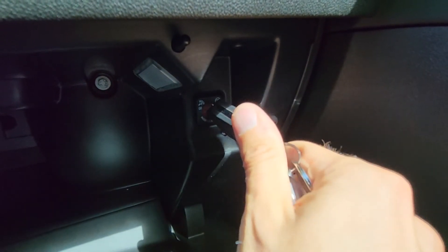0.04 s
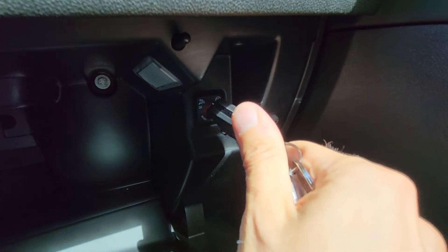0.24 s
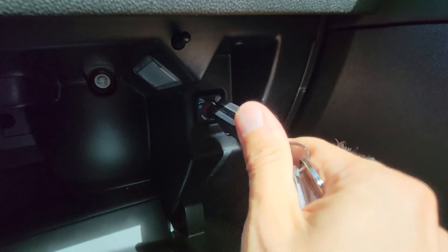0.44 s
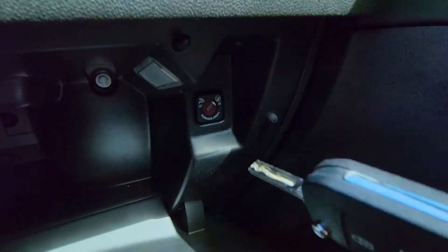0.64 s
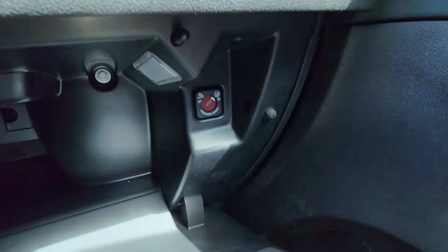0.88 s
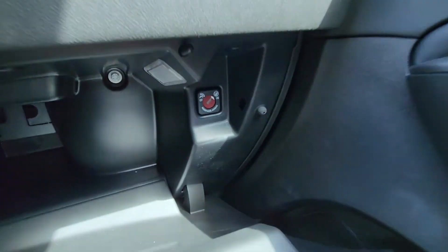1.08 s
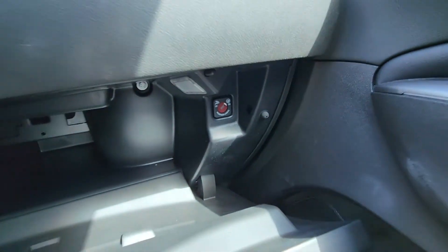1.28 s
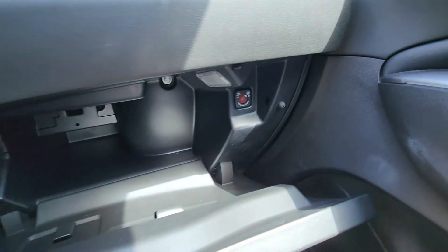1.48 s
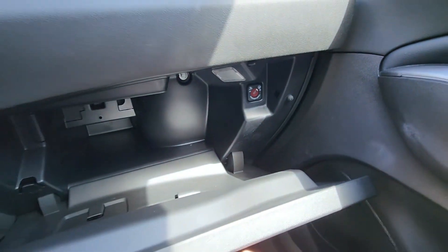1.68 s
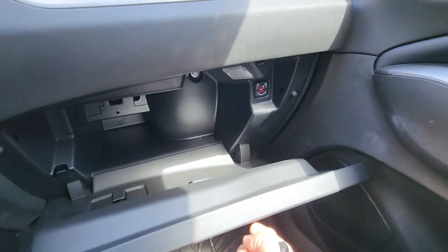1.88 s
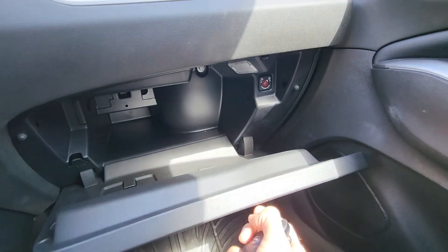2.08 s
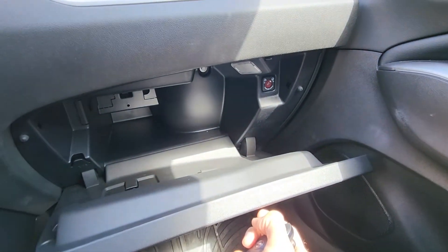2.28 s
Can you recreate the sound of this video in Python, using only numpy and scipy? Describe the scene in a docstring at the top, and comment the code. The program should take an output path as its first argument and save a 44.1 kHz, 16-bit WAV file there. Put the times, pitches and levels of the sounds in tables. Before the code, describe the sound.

A key grinds and jolts out of a glove box lock, clinking on its ring, then a soft hissing slide with a dry bump and one sharp click, close up in a quiet parked car.

```python
"""Key drawn from a glove box lock

Close to the lock in a quiet, dead car cabin, on a hand-held phone with two microphone ports.
The blade grinds and jolts out of the lock (rough noise, struck panel modes) and clinks on its ring (steel modes).
Something slides along the plastic trim with a hiss (finely broken noise) and one bump (a filtered impulse).
Then come a short scuff and one sharp, bright click: a few blows of crackle and ringing modes.
Soft knocks on the trim and low handling rumble go on under it, over a faint steady hush."""
import sys
import numpy as np
from scipy import signal
from scipy.fft import rfft, irfft, next_fast_len
from scipy.io import wavfile

SR = 44100
rng = np.random.default_rng(int(sys.argv[2]) if len(sys.argv) > 2 else 0)


def master_out(mix):
    """Clip the mix to full scale and print it as 16-bit PCM to the path in sys.argv[1]."""
    frames = np.transpose(np.atleast_2d(mix))
    ceiling = np.clip(frames, -1, 1)
    pcm = np.round(ceiling * 32767).astype(np.int16)
    wavfile.write(sys.argv[1], SR, pcm)


N = 102841

# Jolts of the blade over the lock's wafers: t/s, level/dB
WAFER_JOLTS = [(.38, -48), (0.396, -40), (0.412, -32.5), (0.419, -26.5), (0.441, -27), (0.4472, -19.5),
               (0.457, -25.5), (0.477, -30.5), (.483, -18), (.497, -20.5), (.505, -24.5)]
# Grinding level as the key is pulled: t/s, level/dB
PULL_LEVEL = [(.3, -89), (.375, -64.5), (.41, -37), (.455, -30.5), (.47, -39.5), (.51, -31.5),
              (.535, -60.5), (.57, -49.5), (.61, -100)]
# Modes of the plastic lock panel: f/Hz, level/dB, T60/s
PANEL_MODES = [(179, -7, 0.16), (262, -7.5, 0.28), (324, -1.5, 0.14), (546.3, -3.5, 0.089),
               (672.4, 0, 0.063), (1055, -8, 0.059), (1418, 6, 0.031), (1790, -6, 0.027)]
# Colour of the grinding: f/Hz, level/dB
GRIND_COLOUR = [(80, -20.5), (170, -11.5), (310, 1), (430, -10.5), (600, 2), (900, -13), (1500, -8.5),
                (2100, -20.5), (4500, -34.5), (9000, -39.5), (16000, -54)]
# Place of the lock, a little to the right: f/Hz, left minus right/dB
LOCK_BALANCE = [(150, -0.5), (600, -2), (1400, -8), (2500, -4.5)]
# Key against ring: t/s, level/dB, tilt/(dB per octave), T60 of the crack/s, body f/Hz, sheen f/Hz
RING_CLINKS = [(0.448, -33.5, -3, 0.031, 5000, 13000), (0.468, -40.5, 1, 0.043, 4650, 12100),
               (0.4737, -28.5, 5, 0.089, 4800, 9500), (0.4827, -17, 7, 0.028, 3940, 13500),
               (0.496, -34, -14.5, 0.078, 4100, 9670), (0.5286, -36, 4, 0.016, 3400, 9730),
               (0.543, -29, 3.5, 0.02, 3360, 8500), (0.5495, -21, 1, 0.03, 4835, 11930),
               (0.5509, -23.5, -1, 0.017, 3560, 12180), (0.5882, -24, -0.5, 0.022, 3250, 11600),
               (0.624, -30, -7, 0.023, 2740, 12000), (0.6314, -23, 2.5, 0.03, 2950, 11900),
               (0.683, -32.5, -7, 0.029, 3400, 12000), (0.6977, -28.5, -2, 0.019, 4400, 7100),
               (0.7763, -24, -3.5, 0.015, 3870, 12400), (0.8154, -35.5, 0.5, 0.029, 4560, 14000),
               (0.828, -33, 4, 0.039, 4500, 14500), (.867, -36.5, -1.5, 0.035, 4600, 7260)]
# Modes of key and ring: f/Hz, level/dB, T60/s
STEEL_MODES = [(2900, -2, 0.022), (3430, -7, 0.012), (3700, -1, 0.029), (4050, -1.5, 0.012),
               (4720, 1, 0.036), (5350, -12, .03), (6140, -5, .035), (6700, -9.5, 0.032),
               (7310, -1.5, 0.036), (9500, 2, 0.031), (11900, -7, .03), (12540, -9.5, 0.034),
               (13750, -5.5, 0.025)]
# Colour of the metal contact: f/Hz, level/dB
STEEL_COLOUR = [(300, -36.5), (1300, -20), (2000, -5), (2800, 1.5), (4700, 1), (6500, -2.5), (9500, -4.5),
                (12200, -3), (16000, -6)]
# Blows of the sharp click, then its small bounces: t/s, level/dB
CLICK_BLOWS = [(1.4013, -26), (1.404, -16), (1.407, -14.5), (1.4103, -21), (1.4205, -40), (1.4245, -36),
               (1.431, -44)]
# Modes of the clicking part: f/Hz, level/dB, T60/s
CLICK_MODES = [(1826, -11, .055), (2040, 0, .045), (2260, -7, .035), (2950, -10, .05), (3700, -12, .045),
               (4346, -5, .05), (4534, -4, .05), (5330, -6, .045), (5880, -4, .05), (7106, -9, .045),
               (11917, -5, .048), (12690, -6, .04), (13870, -6, .035), (15210, -2, .04)]
# Colour of the click's crack: f/Hz, level/dB
CLICK_COLOUR = [(200, -45.5), (900, -17), (1400, -6.5), (2200, 2.5), (3050, -8), (4500, 2), (8500, -3.5),
                (13000, 1.5), (16000, -2.5)]
# Faint steel modes that outlast the click: f/Hz, level/dB, T60/s
AFTER_RING_MODES = [(4670, 0, .2), (5030, -9, .16)]
# Level of the slide along the trim: t/s, level/dB
SLIDE_LEVEL = [(.3, -105), (.385, -78), (.43, -60), (.53, -52), (.6, -44.5), (.73, -41.5), (.82, -39.5),
               (1.0, -37), (1.1, -39.5), (1.19, -44), (1.22, -52), (1.25, -69.5), (1.32, -67.5),
               (1.45, -64), (1.56, -76.5), (1.85, -80), (2.0, -89)]
# Colour of the slide: f/Hz, level/dB
SLIDE_HISS = [(60, -10.5), (250, -9.5), (566, -9.5), (900, -12.5), (1450, -8), (2100, -8.5), (2840, -12.5),
              (4530, -9.5), (6000, -17), (9000, -23.5), (12500, -17.5), (16000, -20.5)]
# Level of the scuff around the click: t/s, level/dB
SCUFF_LEVEL = [(1.275, -100), (1.29, -58), (1.305, -76), (1.329, -62), (1.336, -45), (1.343, -43),
               (1.358, -56), (1.376, -56), (1.4, -47), (1.42, -100)]
# Colour of the scuff: f/Hz, level/dB
SCUFF_HISS = [(300, -25), (1200, -10.5), (1950, -3), (2350, -10), (2800, 0.5), (3500, 4), (5500, -6),
              (8300, -5), (16000, -9)]
# Small catches within the scuff: t/s, level/dB
SCUFF_CATCHES = [(1.3316, -37.5), (1.363, -45.5), (1.3796, -41)]
# Colour of these catches: f/Hz, level/dB
CATCH_COLOUR = [(1000, -20), (3000, -9), (5500, 0.5), (8300, -2.5), (16000, -5.5)]
# Colour of the one dry bump: f/Hz, level/dB
BUMP_COLOUR = [(60, -7), (250, -0.5), (520, 6.5), (900, -7), (1500, -2), (3300, -10.5), (4700, -35.5),
               (16000, -52)]
# Dull knocks on the trim: t/s, level/dB, T60 of the thud/s, pitch f/Hz
TRIM_KNOCKS = [(.565, -40.5, .05, 480), (.955, -22, 0.025, 496), (0.9619, -24, 0.036, 514),
               (0.9685, -27, 0.031, 506), (1.263, -46.5, 0.063, 475), (1.2645, -50, 0.014, 1000),
               (1.309, -49, 0.063, 343), (1.548, -56, 0.096, 418), (1.625, -60.5, 0.078, 451),
               (1.803, -55.5, 0.061, 595), (1.827, -58, 0.071, 397), (2.031, -58.5, 0.068, 360),
               (2.111, -58.5, 0.088, 350), (2.133, -54.5, 0.05, 470), (2.215, -58.5, 0.1, 342)]
# Modes of the trim: f/pitch [multiple], level/dB, T60/s
TRIM_MODES = [(.74, -6, 0.017), (1.001, 2, 0.067), (1.4, -5, 0.033)]
# Colour of a knock's thud: f/pitch [multiple], level/dB
THUD_COLOUR = [(.15, -14.5), (.5, -2.5), (1, -0.5), (1.7, -12), (3.2, -24.5), (10, -41.5), (30, -57)]
# Level of the handling rumble: t/s, level/dB
RUMBLE_LEVEL = [(0, -56.5), (.16, -58.5), (.22, -75.5), (.36, -53.5), (.46, -62), (.51, -41.5), (.66, -55),
                (.85, -47.5), (1.15, -52.5), (1.21, -45), (1.28, -54.5), (1.5, -57.5), (1.66, -51),
                (1.78, -61.5), (1.86, -57.5), (2.0, -61), (2.26, -57)]
# Colour of the rumble: f/Hz, level/dB
RUMBLE_TONE = [(20, -19), (50, 3), (75, -4), (105, 2), (150, -16.5), (250, -30), (600, -51.5),
               (2000, -81.5)]
# Shifts of the hand on the phone: t/s, level/dB
HAND_SHIFTS = [(0.5, -49.5), (1.194, -40.5), (1.31, -48), (1.634, -45.5), (1.683, -47.5), (1.83, -41.5)]
# Low modes of the gripped phone: f/Hz, level/dB, T60/s
GRIP_MODES = [(52, -2, 0.22), (99.5, -2, 0.32)]
# Colour of the cabin's hush: f/Hz, level/dB
HUSH_COLOUR = [(30, -1), (150, -7), (400, -7.5), (800, -13), (2000, -21), (4600, -26), (6500, -34.5),
               (10000, -43.5), (12000, -27), (16000, -32.5)]
# Colouring between the two microphone ports: f/Hz, left minus right/dB
PORT_BALANCE = [(100, 0.5), (400, 1), (1500, 0), (4000, -2.5), (6000, 7.5), (8500, 11.5), (11000, -4.5),
                (13000, 0), (16000, 2)]

DULL_HZ, BRIGHT_FROM_S, BRIGHT_TO_S = 810, 0.37, 0.46  # the lock starts dull, brightens as the blade bites
LOCK_LAG_S = 0.0002  # the left port hears the lock later
KEY_SCATTER_DB = 1  # each contact wakes the modes differently
FAVOUR_DB, BODY_OCTAVES, SHEEN_OCTAVES = 7.5, 0.22, 0.12  # lift near a clink's two pitches, and its widths
AFTER_RING_S, AFTER_RING_DB = 1.4073, -44
BUMP_S, BUMP_DB = 0.9476, -3
CONTACT_RISE_S = 0.00046  # a contact chatters before it is fully made
ALIKE_HZ = 822  # the likeness of the two ports has halved here
ROOM_T60_S, ROOM_DB = 0.06, -18
HUSH_DB = -75
TOP_HZ, STOP_S = 15800, 2.27  # upper limit of the phone, and the time it falls silent


def lock():
    """The blade grinds out of the lock and jolts the plastic panel's modes at each wafer."""
    out = colour(friction(rate=420, rough_db=1.0), GRIND_COLOUR) * curve(PULL_LEVEL)
    for s, db in WAFER_JOLTS:
        panel = undb(-3.0) * ring(PANEL_MODES)
        scrape = undb(-4.5) * crack(GRIND_COLOUR, t60=0.017)
        add(out, s, undb(db) * (panel + scrape))
    dull = signal.sosfilt(signal.butter(2, DULL_HZ, fs=SR, output="sos"), out)
    bite = np.interp(np.arange(N) / SR, [BRIGHT_FROM_S, BRIGHT_TO_S], [0, 1]) ** 2
    left, right = balance(dull + bite * (out - dull), LOCK_BALANCE)
    return np.array([np.roll(left, int(LOCK_LAG_S * SR)), right])


def key_ring():
    """Short bright clinks of steel damped by the hand, each coloured by where it touches."""
    out = np.zeros((2, N))
    mode_hz, mode_db, mode_t60 = np.array(STEEL_MODES).T
    contact_hz, contact_db = np.array(STEEL_COLOUR).T
    # a fine grid, so that the narrow lifts show in the colour
    grid_hz = np.geomspace(contact_hz[0], contact_hz[-1], 120)
    grid_db = np.interp(np.log(grid_hz), np.log(contact_hz), contact_db)
    for s, db, tilt, t60, body_hz, sheen_hz in RING_CLINKS:
        mode_lift = tilt * np.log2(mode_hz) + favour(mode_hz, body_hz, sheen_hz)
        grid_lift = tilt * np.log2(grid_hz) + favour(grid_hz, body_hz, sheen_hz)
        woken_db = mode_db + mode_lift + KEY_SCATTER_DB * rng.standard_normal(len(mode_hz))
        contact = undb(3) * crack(np.c_[grid_hz, grid_db + grid_lift], t60)
        steel = undb(-2) * ring(np.c_[mode_hz, woken_db, mode_t60])
        add(out, s, undb(db) * (contact + steel))
    return out


def favour(hz, body_hz, sheen_hz):
    """dB by which a point of contact lifts the steel's modes near its two pitches."""
    body = np.exp(-(np.log2(hz / body_hz) / BODY_OCTAVES) ** 2)
    sheen = np.exp(-(np.log2(hz / sheen_hz) / SHEEN_OCTAVES) ** 2)
    return FAVOUR_DB * (body + sheen)


def click():
    """A hard part snaps home in a few blows within ten milliseconds, bounces and rings on faintly."""
    out = np.zeros((2, N))
    for s, db in CLICK_BLOWS:
        contact = undb(1.0) * crack(CLICK_COLOUR, t60=0.032)
        body = undb(-2.0) * ring(CLICK_MODES)
        add(out, s, undb(db) * (contact + body))
    add(out, AFTER_RING_S, undb(AFTER_RING_DB) * ring(AFTER_RING_MODES))
    return out


def sliding():
    """A long fine-grained rub over the trim, then a short rougher scuff that catches three times."""
    out = colour(friction(rate=2200, rough_db=1.0), SLIDE_HISS) * curve(SLIDE_LEVEL)
    out += colour(friction(rate=300, rough_db=2), SCUFF_HISS) * curve(SCUFF_LEVEL)
    for s, db in SCUFF_CATCHES:
        add(out, s, undb(db) * crack(CATCH_COLOUR, t60=0.025))
    return out


def knocks():
    """One dry bump as a filtered impulse, and softer knocks that wake modes of the plastic trim."""
    impulse = np.zeros((2, N))
    add(impulse, BUMP_S, undb(BUMP_DB) * np.ones((2, 1)))
    out = balance(colour(impulse, BUMP_COLOUR), LOCK_BALANCE)
    for s, db, t60, hz in TRIM_KNOCKS:
        thud = crack([(hz * k, level) for k, level in THUD_COLOUR], t60)
        body = ring([(hz * k, level, length) for k, level, length in TRIM_MODES])
        add(out, s, undb(db) * (undb(-1.0) * thud + undb(-6.5) * body))
    return out


def handling():
    """Low rumble and thumps from the hand that holds the phone: dark noise and struck low modes."""
    out = unit(colour(noise(N), RUMBLE_TONE)) * curve(RUMBLE_LEVEL)
    for s, db in HAND_SHIFTS:
        add(out, s, undb(db) * ring(GRIP_MODES))
    return out


def cabin(x, size=12000):
    """Add the short tail of an upholstered cabin: noise that swells quickly and dies away."""
    tail = rng.standard_normal((2, size)) * (fade(ROOM_T60_S, size) - fade(0.023, size))
    echoes = signal.fftconvolve(x, unit(tail) / np.sqrt(size), axes=1)[:, :N]
    return x + undb(ROOM_DB) * echoes


def hush():
    """The faint steady noise of the quiet cabin."""
    return undb(HUSH_DB) * colour(noise(N), HUSH_COLOUR)


def friction(rate, rough_db):
    """Noise broken into tiny catches (rate per second) of uneven strength."""
    catch = np.cumsum(rng.random(N) < rate / SR)
    strength_db = rough_db * rng.standard_normal(N)
    return unit(noise(N) * undb(strength_db[catch]))


def ring(modes, size=12000):
    """Struck modes, slightly detuned; the higher ones reach the two ports out of step."""
    t, out = np.arange(size) / SR, 0
    for hz, db, t60 in modes:
        phase = rng.standard_normal((2, 1)) * min(hz / ALIKE_HZ / 2, 2)
        detune = 1 + 0.004 * rng.standard_normal()
        out = out + undb(db) * fade(t60, size) * np.sin(2 * np.pi * hz * detune * t + phase)
    return onset(size) * out / np.linalg.norm(undb(np.array(modes)[:, 1]))


def crack(points, t60, size=12000):
    """The dense, quickly dying modes of a contact, as decaying coloured noise."""
    return colour(noise(size) * onset(size) * fade(t60, size), points)


def onset(size):
    """The quick rise of a contact as it is made."""
    return 1 - np.exp(-np.arange(size) / SR / CONTACT_RISE_S)


def fade(t60, size):
    """Exponential decay by 60 dB in t60 seconds."""
    return np.exp(-np.log(1000) * np.arange(size) / SR / max(t60, 1e-3))


def noise(size):
    """Noise at two ports: nearly alike in the bass, unrelated in the treble."""
    mid, side = rfft(rng.standard_normal((2, size)))
    alike = 0.93 / (1 + (np.fft.rfftfreq(size, 1 / SR) / ALIKE_HZ) ** 2)
    mid = mid * np.sqrt((1 + alike) / 2)
    side = side * np.sqrt((1 - alike) / 2)
    return irfft(np.array([mid + side, mid - side]), size)


def colour(x, points, size=8192):
    """Causal (minimum-phase) filter of unit energy through (f/Hz, level/dB) points."""
    cepstrum = irfft(np.log(undb(shape(points, size))))
    # folding the cepstrum onto positive time makes the filter causal
    cepstrum[1:size // 2] *= 2
    cepstrum[size // 2 + 1:] = 0
    h = irfft(np.exp(rfft(cepstrum)))
    return signal.fftconvolve(x, h[None] / np.linalg.norm(h))[:, :x.shape[1]]


def balance(x, points):
    """Lean each frequency left or right by (f/Hz, left minus right/dB) points."""
    size = 2 * next_fast_len(N)
    gain = undb(np.array([[0.5], [-0.5]]) * shape(points, size))
    return irfft(rfft(x, size) * gain, size)[:, :N]


def shape(points, size):
    """dB at every frequency bin from (f/Hz, level/dB) points."""
    hz, db = np.array(points, float).T
    return np.interp(np.log(np.fft.rfftfreq(size, 1 / SR) + 1), np.log(hz), db)


def curve(rows):
    """Gain over time from (t/s, level/dB) points."""
    return undb(np.interp(np.arange(N) / SR, *np.array(rows).T))


def undb(db):
    """Decibels to gain."""
    return 10 ** (np.asarray(db) / 20)


def unit(x):
    """Scale to rms 1."""
    return x / np.sqrt(np.mean(x ** 2))


def add(out, s, x):
    """Mix x in at time s."""
    i = int(s * SR)
    out[:, i:i + x.shape[1]] += x[:, :N - i]


def scene():
    """The sources close by in the cabin, with the handling of the phone and the hush."""
    near = cabin(lock() + key_ring() + click() + knocks() + sliding())
    return near + handling() + hush()


def record(dry):
    """The two ports colour the sound differently; the phone cuts the top and stops."""
    size = next_fast_len(N) * 2
    low_pass = 1 / np.sqrt(1 + (np.fft.rfftfreq(size, 1 / SR) / TOP_HZ) ** 300)
    running = np.clip((STOP_S - np.arange(N) / SR) / 0.005, 0, 1)  # 5 ms fade to silence
    return irfft(rfft(balance(dry, PORT_BALANCE), size) * low_pass, size)[:, :N] * running


dry = scene()
out = record(dry)
master_out(out)
```